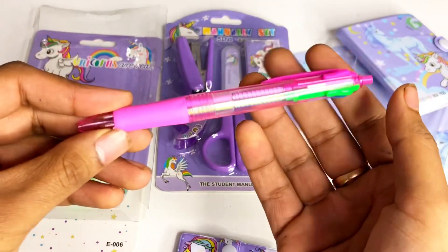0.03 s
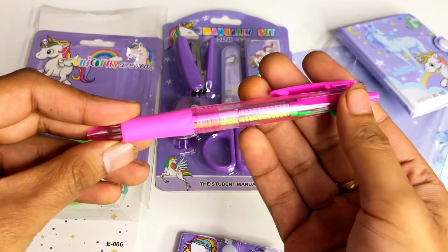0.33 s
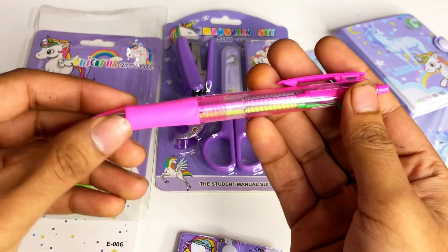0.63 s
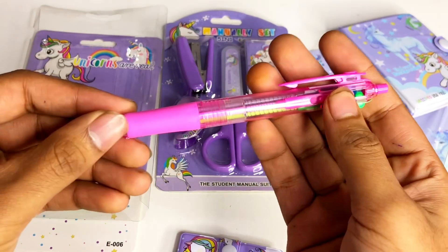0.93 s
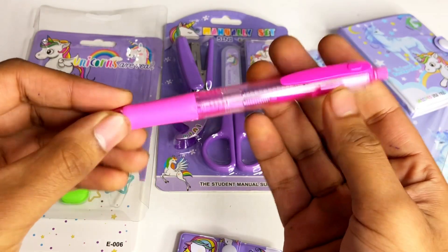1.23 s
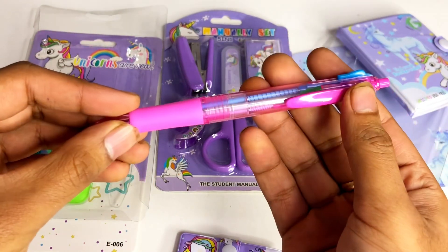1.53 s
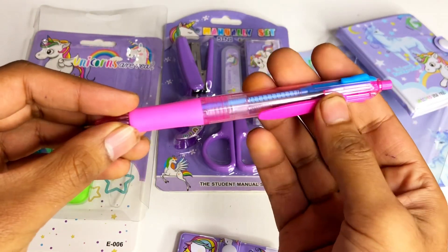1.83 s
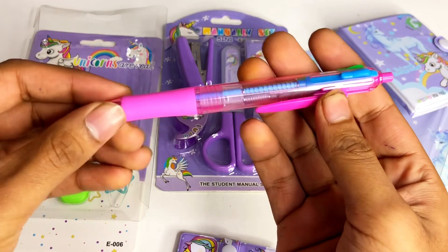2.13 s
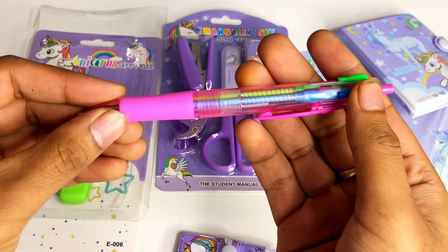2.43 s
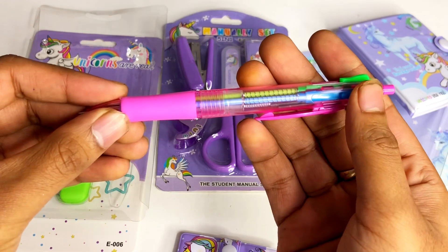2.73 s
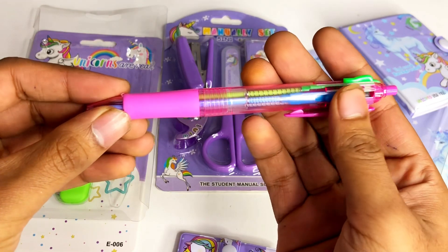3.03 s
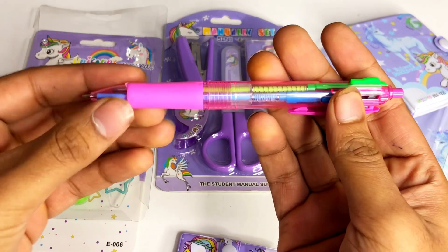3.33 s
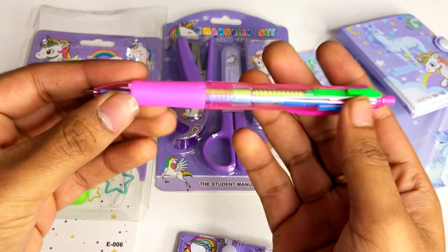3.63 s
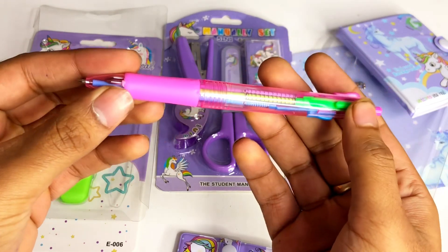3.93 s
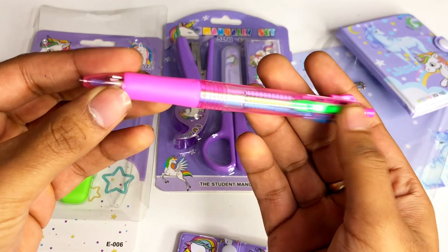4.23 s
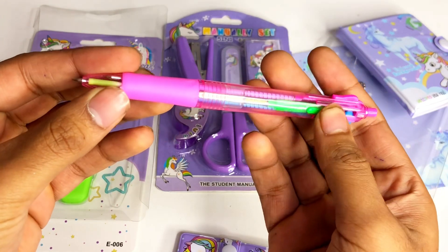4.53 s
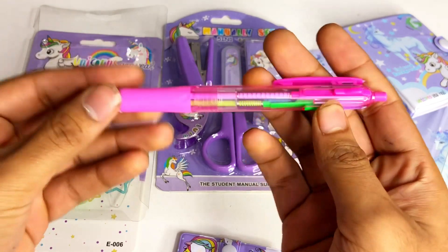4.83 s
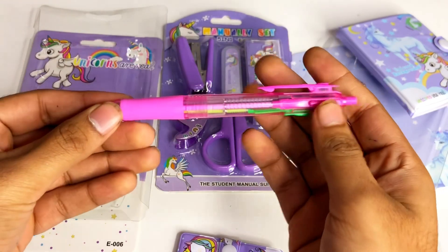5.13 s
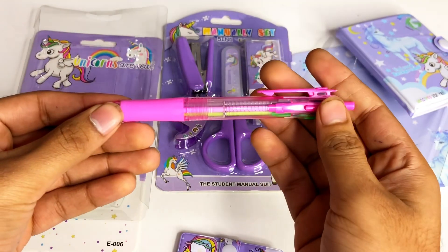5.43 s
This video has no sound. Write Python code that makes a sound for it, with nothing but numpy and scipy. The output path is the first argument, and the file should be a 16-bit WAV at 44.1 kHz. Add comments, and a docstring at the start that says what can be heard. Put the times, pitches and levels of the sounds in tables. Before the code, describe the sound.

A plastic multicolour pen clicks sharply as its sliders latch and spring back four times, over a faint low room hum.

```python
"""A low hum and faint ticks in a small, hard-walled room: loose parts knock inside a multicolour
plastic pen as it is turned close to the microphone. The thumb pushes a slider down, with a rub and
a thin squeak the first time, until it latches; then its spring throws it back against the stop.
Four presses, four releases. Each click is a burst of chatter that rings the plastic and the room."""
import sys
import numpy as np
from scipy import signal
from scipy.fft import rfft, irfft, next_fast_len
from scipy.io import wavfile
from scipy.ndimage import uniform_filter1d, minimum_filter1d

SR = 44100
rng = np.random.default_rng(int(sys.argv[2]) if len(sys.argv) > 2 else 0)


def transcribe(u):
    """Save the signal u as a 16-bit wav file named by the first command-line argument.

    u: samples, shape (n,) or (channels, n), limited to [-1, 1]; the rate is SR.
    q: integer samples, one column per channel.
    """
    v = np.clip(np.atleast_2d(u).T, -1, 1)
    q = np.round(v * 32767).astype(np.int16)
    wavfile.write(sys.argv[1], SR, q)


N = 246078
TIME = np.arange(N) / SR


def amp(db):
    """Decibels to gain."""
    return 10 ** (np.asarray(db) / 20)


def unit(x):
    """Scales to rms 1."""
    return x / np.sqrt(np.mean(x ** 2) + 1e-20)


def curve_at(points, hz):
    """Reads (Hz, value) points on a log-frequency axis."""
    f, value = np.transpose(points)
    return np.interp(np.log(hz + 1), np.log(f + 1), value)


def fader(points):
    """Gain ride through (s, dB) points, silent before and after."""
    s, db = np.transpose(points)
    return np.interp(TIME, s, amp(db), left=0, right=0)


def add(mix, s, sound):
    """Mixes a sound in at s seconds."""
    part = mix[max(round(s * SR), 0):][:len(sound)]
    part += sound[:len(part)]


def equalise(x, points):
    """Minimum-phase EQ with the given (Hz, dB) shape."""
    size = 2 * next_fast_len(len(x))
    log_gain = np.log(amp(curve_at(points, abs(np.fft.fftfreq(size, 1 / SR)))))
    response = np.exp(np.conj(signal.hilbert(log_gain)))
    return np.fft.ifft(np.fft.fft(x, size) * response).real[:len(x)]


def noise(points):
    """Steady noise of rms 1 with the given (Hz, dB) shape."""
    shape = amp(curve_at(points, np.fft.rfftfreq(N, 1 / SR)))
    return unit(irfft(rfft(rng.standard_normal(N)) * shape, N))


def drift(rate_hz):
    """Smooth random modulation of rms 1, rolling off above rate_hz."""
    shape = np.exp(-(np.fft.rfftfreq(N, 1 / SR) / rate_hz) ** 2)
    return unit(irfft(rfft(rng.standard_normal(N)) * shape, N))


# spectrum of the still air: f/Hz, relative level/dB
AIR_SPECTRUM = [(30, -28), (60, -13), (150, -5), (250, 1.5), (340, -7), (580, -7), (800, -13.5),
                (1500, -17), (4000, -23), (7000, -29.5), (11000, -31), (13200, -26.5), (15500, -32),
                (16300, -52)]
# the hum: f/Hz, level before trim/dB
HUM_TONES = [(200, -61.5)]
# three low room resonances that carry a distant rumble: f/Hz, waver rate/Hz, trim/dB
RUMBLE_BANDS = [(51.3, 7, -1), (92.7, 18, -.5), (125, 23, 0)]
# the swell of each resonance: t/s, level before trim/dB
RUMBLE_DEEP = [(0, -75), (0.3, -70), (1, -71), (2, -79.5), (3.4, -68), (4, -62), (4.3, -71), (5.58, -76.5)]
RUMBLE_MIDDLE = [(0, -70), (0.8, -62.5), (1.15, -53), (2.5, -62), (2.8, -65.5), (4.4, -67), (5.58, -64)]
RUMBLE_UPPER = [(0, -76), (0.5, -59.5), (0.8, -69), (1.3, -60), (2.351, -58), (2.8, -64.5), (4.7, -69.5),
                (5.2, -56.5), (5.58, -56.5)]


def room_tone(air_db=-60.5, hum_trim_db=-1.5):
    """The bed: room air, a steady hum and a wavering rumble that swells slowly."""
    hum = rumble = 0
    for hz, db in HUM_TONES:
        hum += amp(db + hum_trim_db) * unit(np.sin(2 * np.pi * hz * TIME + 0.32 * drift(4)))
    swells = RUMBLE_DEEP, RUMBLE_MIDDLE, RUMBLE_UPPER
    for (hz, waver_hz, trim_db), swell in zip(RUMBLE_BANDS, swells):
        drone = np.sin(2 * np.pi * hz * TIME + 0.79 * drift(waver_hz))
        drone *= amp(2.8 * drift(waver_hz))
        rumble += unit(drone) * amp(np.interp(TIME, *np.transpose(swell)) + trim_db)
    return amp(air_db) * noise(AIR_SPECTRUM) + hum + rumble


def chatter(t, decay_s, attack_s=0.00054):
    """The force of plastic chattering on plastic: a ragged burst, evened out to a near-flat spectrum."""
    burst = rng.standard_normal(len(t)) * np.exp(-t / decay_s) * (1 - np.exp(-t / attack_s))
    power = uniform_filter1d(abs(rfft(burst)) ** 2, size=5)
    return equalise(burst, np.c_[np.fft.rfftfreq(len(t), 1 / SR), -10 * np.log10(power + 1e-9)])


# spectrum of the bare crack of a contact: f/Hz, relative level/dB
CRACK_SPECTRUM = [(100, -49.5), (500, -39), (1200, -18), (4000, -7.5), (7000, 1.5), (10000, 12.5),
                  (14000, -4.5), (17000, -11)]


def impact(modes, tone_db, chatter_s, crack_db):
    """A contact rings the plastic: its modes stand on the bare crack. Energy of 3 ms at rms 1."""
    t = np.arange(1024) / SR
    hz = np.fft.rfftfreq(2 * len(t), 1 / SR)
    power = amp(curve_at(CRACK_SPECTRUM, hz) + crack_db) ** 2
    for centre, width, db in modes:
        power += amp(db) ** 2 / (1 + 2 * ((hz - centre) / width) ** 2) ** 2
    low, mid, high = tone_db  # each slider and grip favours other bands, near 2, 7 and 10 kHz
    grip_eq = [(100, -23.5), (600, low), (3000, low), (5800, mid), (7800, mid),
               (9500, high), (11200, high), (12800, -1.0)]
    response_db = 10 * np.log10(power) + curve_at(grip_eq, hz)
    ring = equalise(chatter(t, chatter_s), np.c_[hz, response_db])
    return ring * np.sqrt(.003 * SR / np.sum(ring ** 2))


# reverb of the hard walls: f/Hz, relative level/dB, t60/s
ROOM_REVERB = [(200, -13, .4), (696, 4.5, 0.53), (1192, -3, 0.55), (1700, 5.5, 0.62), (2520, 0, 0.64),
               (5000, -4.5, 0.69), (6500, 0.5, 0.6), (7020, 3.5, 0.64), (8600, -5, 0.6),
               (12200, -0.5, 0.43), (15700, 1.5, .42), (16100, -29, .3)]


def reverb(x, wall_s=0.01, early_db=-10):
    """Weak scatter from hands and table, then the walls answer; every contact finds its own paths."""
    t = np.arange(len(x) * 30) / SR
    echoes = rng.standard_normal(len(t)) * np.where(t < wall_s, amp(early_db), 1) * (t > .001)
    hz, frame_s, spectra = signal.stft(echoes, SR, nperseg=256)
    f, db, t60 = np.transpose(ROOM_REVERB)
    decay_db = 60 * frame_s / curve_at(np.c_[f, t60], hz)[:, None]
    spectra *= amp(curve_at(np.c_[f, db], hz)[:, None] - decay_db)
    tail = signal.istft(spectra, SR, nperseg=256)[1]
    return signal.fftconvolve(x, tail / np.linalg.norm(tail))


def place(mix, s, hit, send_db):
    """Drops a hit into the mix at s seconds, along with its reverb."""
    add(mix, s, hit)
    add(mix, s, amp(send_db) * reverb(hit))


# ring of the small loose parts: f/Hz, width/Hz, relative level/dB
LOOSE_MODES = [(2257, 1700, -4), (5700, 4000, -0.5), (10000, 2000, -18), (12310, 2300, 9.5)]
# tick cues: t/s, level/dB, low EQ/dB
TICK_CUES = [(0.0201, -44, 3.5), (0.1573, -40.5, -1), (0.168, -41.5, 8.5), (0.209, -52.5, -11),
             (0.2835, -41, 3), (0.288, -46.5, 14), (0.3076, -46, 9), (0.765, -52, -2.5),
             (1.1822, -46, 16.5), (1.237, -51, 3), (1.3351, -48, 7), (1.3864, -49.5, 4.5),
             (3.6673, -46.5, 4.5), (5.0991, -55.5, 11), (5.2, -55.5, -8)]


def ticks(rebound_s=0.016, rebound_db=-12.5):
    """Loose sliders and refills knock lightly in the turning barrel; each falls back once, softer."""
    track = np.zeros(N)
    waits = rebound_s * rng.uniform(.7, 1.3, len(TICK_CUES))
    rebounds = [(s + wait, db + rebound_db, low_db) for (s, db, low_db), wait in zip(TICK_CUES, waits)]
    for s, db, low_db in TICK_CUES + rebounds:
        tick = impact(LOOSE_MODES, tone_db=(low_db, 3, 0), chatter_s=.002, crack_db=-6)
        place(track, s, amp(db) * tick, send_db=-9)
    return track


# fader ride of the rub: t/s, level/dB
RUB_RIDE = [(.76, -80), (.83, -68), (.91, -58), (.95, -83), (1.002, -58.5), (1.011, -92.5)]
# fader ride of the squeak: t/s, level/dB
SQUEAK_RIDE = [(.54, -78), (.65, -81), (.68, -99), (.77, -68.5), (.81, -70.5), (.9, -72), (.99, -81.5)]
# sagging pitch of the squeak: t/s, f/Hz
SQUEAK_PITCH = [(.54, 6010), (.77, 5870), (1.0, 5790)]


def slide(jitter_hz=45):
    """Grainy friction and a thin squeak as the first slider is pushed along its slot."""
    hiss = noise([(1500, -7), (5000, -11.5), (8000, -7.5), (12500, -3), (15500, -6), (16500, -35)])
    grain = unit(amp(2 * drift(150)))
    pitch_hz = np.interp(TIME, *np.transpose(SQUEAK_PITCH)) + jitter_hz * drift(250)
    squeak = unit(np.sin(2 * np.pi * np.cumsum(pitch_hz) / SR))
    return hiss * grain * fader(RUB_RIDE) + squeak * fader(SQUEAK_RIDE)


# ring of the barrel, held in the fingers: f/Hz, width/Hz, relative level/dB
BARREL_MODES = [(720, 610, -12), (2510, 700, -12.5), (3760, 820, -11), (5400, 800, -8), (6456, 1400, -5.5),
                (10150, 550, 1), (11340, 450, -12.5), (12510, 1900, 3.5), (13400, 840, -2),
                (14950, 710, -2.5)]
# press cues: t/s, catch level/dB, seat level/dB, low EQ/dB, mid EQ/dB, high EQ/dB
LATCH_CUES = [(1.0116, -20, -23, 4.5, 0, 5.5), (1.8037, -19, -19, -0.5, 2.5, 5),
              (3.118, -24.5, -21.5, -3, 3, 1.5), (4.5184, -21.5, -21.5, 1.5, 0, 2)]


def latches(seat_after_s=0.00076, seat_eq_db=-3):
    """Each press ends in a sharp catch on the latch and a thinner, longer chatter as the slider seats."""
    track = np.zeros(N)
    for s, catch_db, seat_db, *tone_db in LATCH_CUES:
        catch = impact(BARREL_MODES, tone_db, chatter_s=0.0006, crack_db=-13)
        place(track, s, amp(catch_db) * catch, send_db=-11.5)
        seat = impact(BARREL_MODES, np.add(tone_db, seat_eq_db), chatter_s=0.0022, crack_db=-30)
        place(track, s + seat_after_s, amp(seat_db) * seat, send_db=-16)
    return track


# ring of a refill with its spring: f/Hz, width/Hz, relative level/dB
REFILL_MODES = [(1185, 180, -13), (2460, 297, -13), (3560, 720, -17.5), (5440, 500, -19.5),
                (6670, 630, -12), (7200, 520, -7), (10050, 460, -14.5), (10760, 850, 0), (12340, 920, -2),
                (13220, 690, 4.5), (15350, 580, -8.5), (15650, 550, -3)]
# release cues: t/s, flight/s, slip level/dB, stop level/dB, stop reverb send/dB,
# low EQ/dB, mid EQ/dB, high EQ/dB
SNAP_CUES = [(1.6669, 0.0057, -13, -12.5, 0.5, -3, -3, -8), (2.9204, .006, -22, -13, -2, 1.5, -7, -3),
             (4.2458, .0044, -19, -14, -0.5, 2, 0.5, -6.5), (5.4365, 0.0044, -18.5, -8, -7, 0, 1.5, -8.5)]


def snaps():
    """Each release scrapes off the latch, then the spring slams the refill against its stop."""
    track = np.zeros(N)
    for s, flight_s, slip_db, stop_db, send_db, *tone_db in SNAP_CUES:
        slip = impact(REFILL_MODES, tone_db, chatter_s=0.0019, crack_db=-16)
        place(track, s, amp(slip_db) * slip, send_db - 9)  # drier than the stop
        stop = impact(REFILL_MODES, tone_db, chatter_s=0.0007, crack_db=-11.5)
        place(track, s + flight_s, amp(stop_db) * stop, send_db)
    return track


def scene():
    """The pen up close over the room tone, in mono."""
    return (room_tone() + ticks() + slide() + latches() + snaps())[None]


def record(dry, ceiling=.9, top_hz=16600):
    """A fast limiter holds the sharpest peaks; a steep low-pass trims the top."""
    gain = ceiling / np.maximum(abs(dry), ceiling)
    smooth_gain = uniform_filter1d(minimum_filter1d(gain, size=65), size=65)
    low_pass = signal.firwin(255, top_hz, window=("kaiser", 9), fs=SR)
    return signal.oaconvolve(dry * smooth_gain, low_pass[None], "same")


dry = scene()
out = record(dry)
transcribe(out)
```